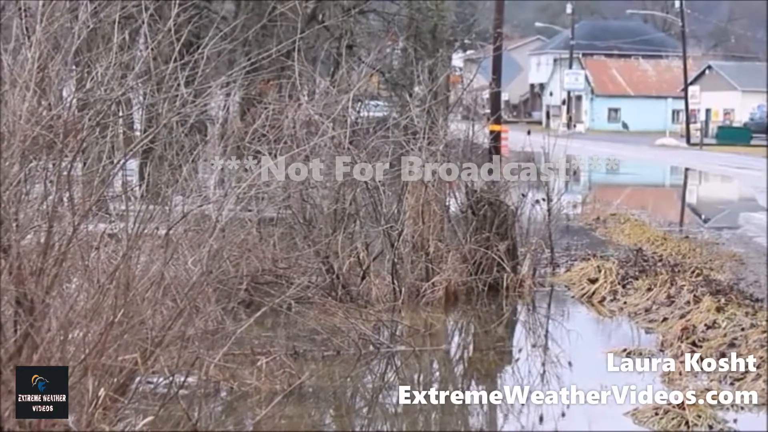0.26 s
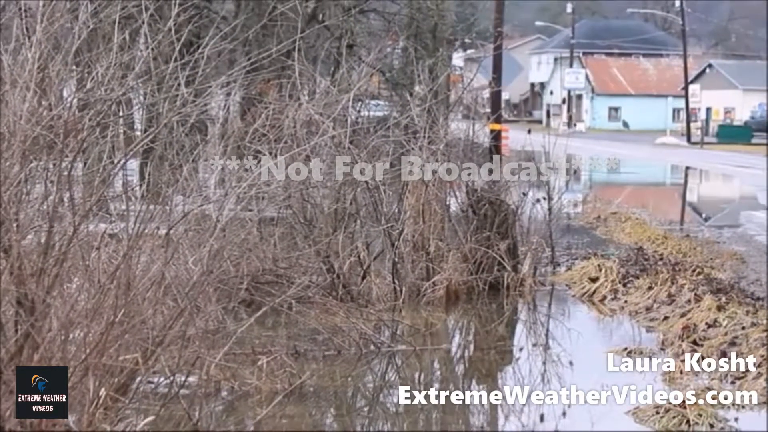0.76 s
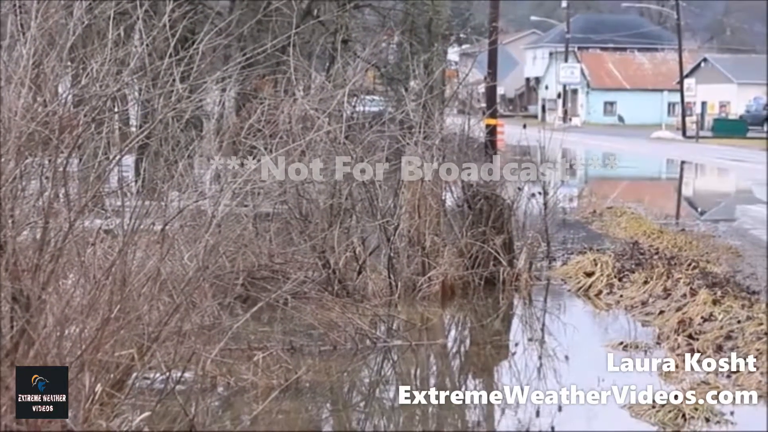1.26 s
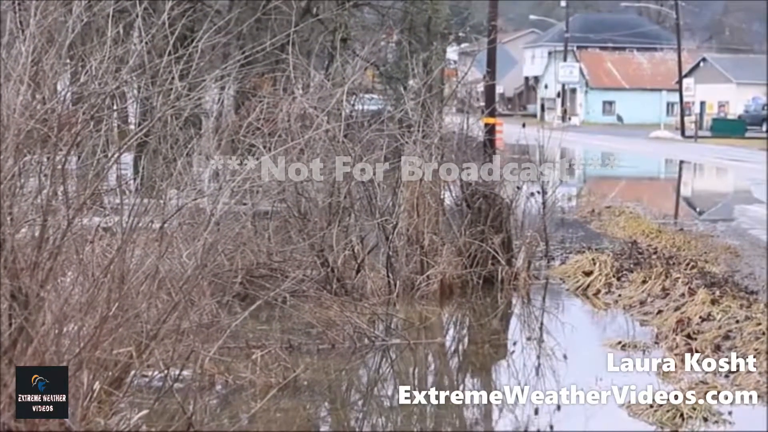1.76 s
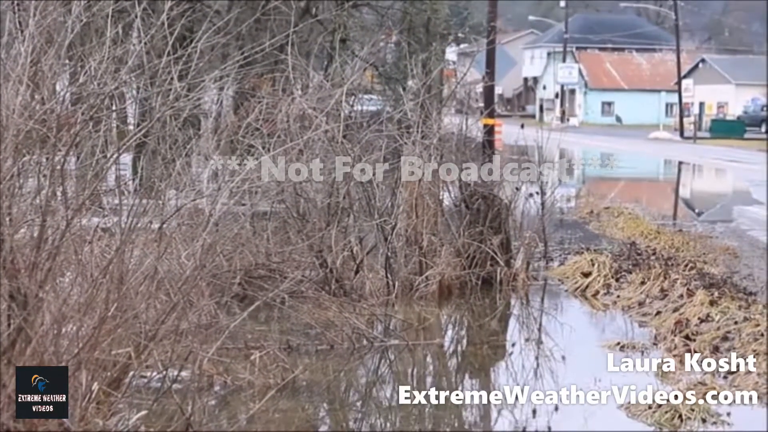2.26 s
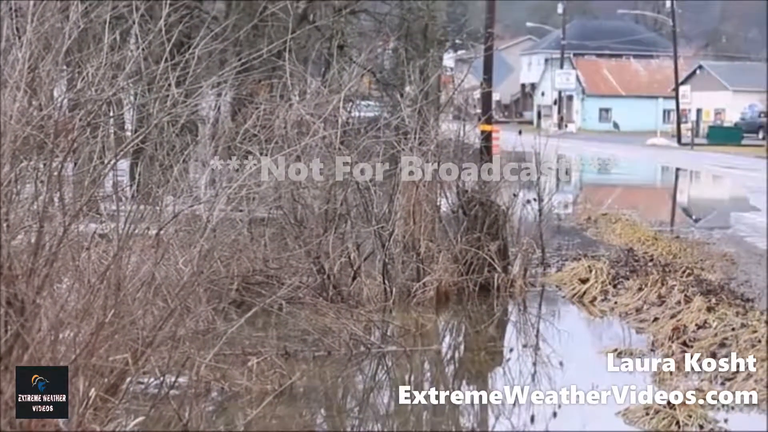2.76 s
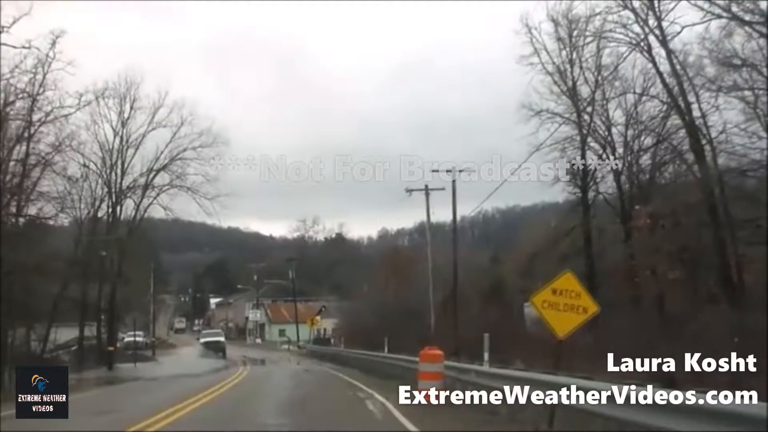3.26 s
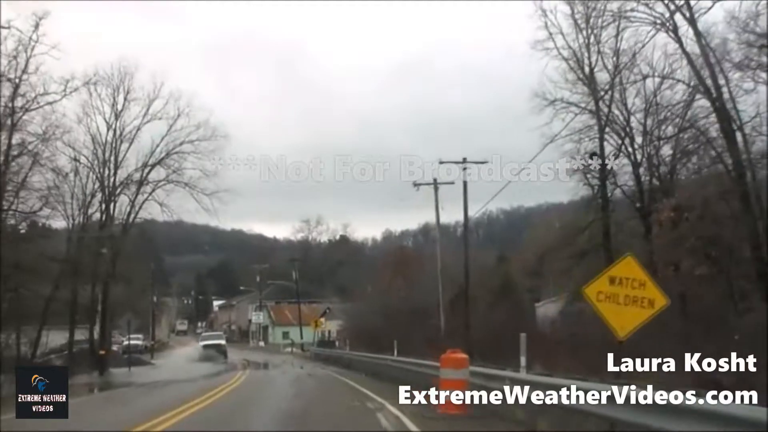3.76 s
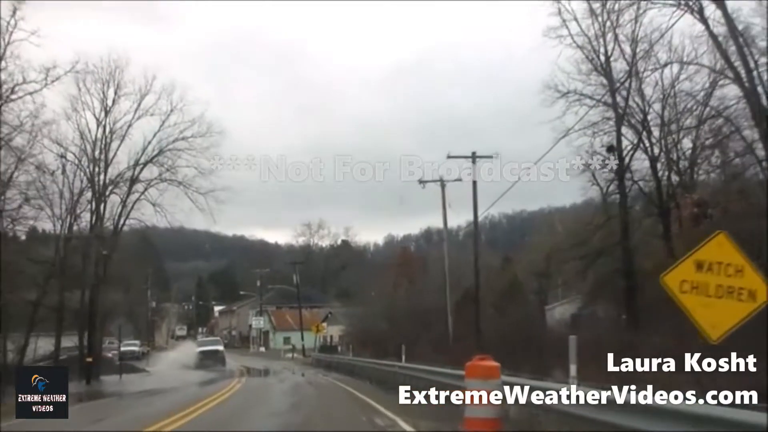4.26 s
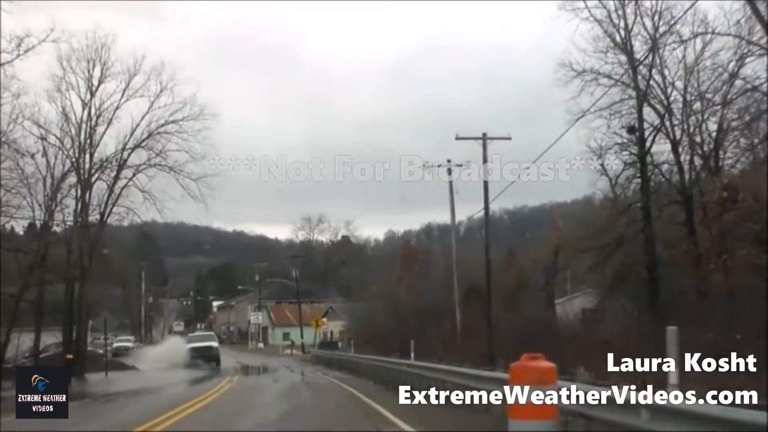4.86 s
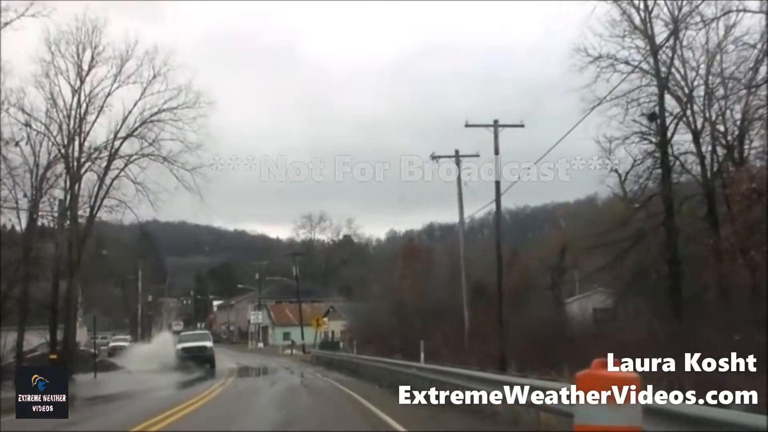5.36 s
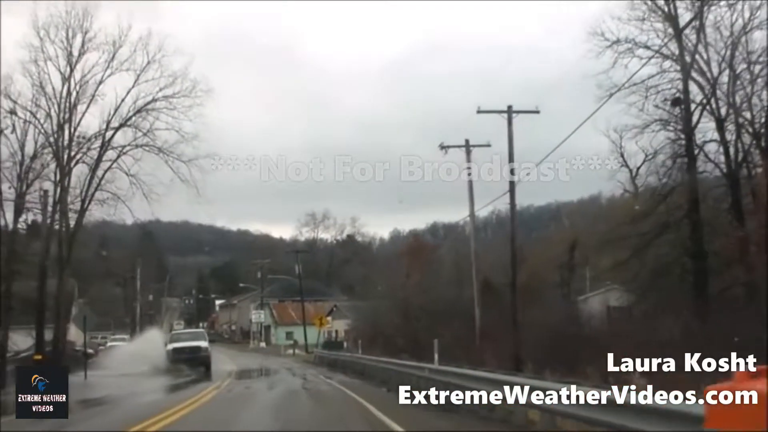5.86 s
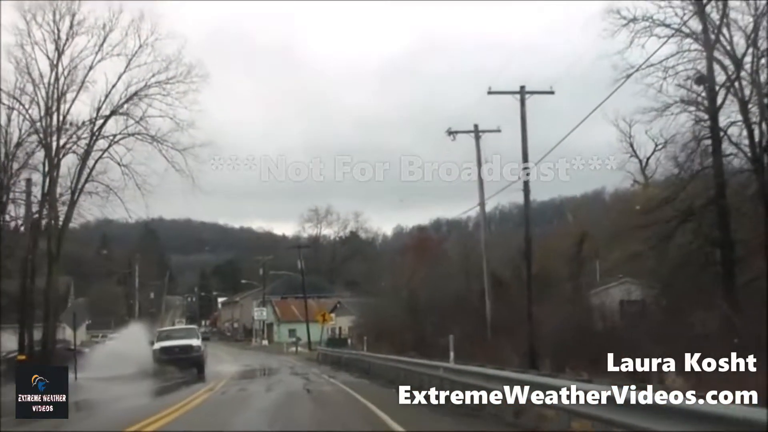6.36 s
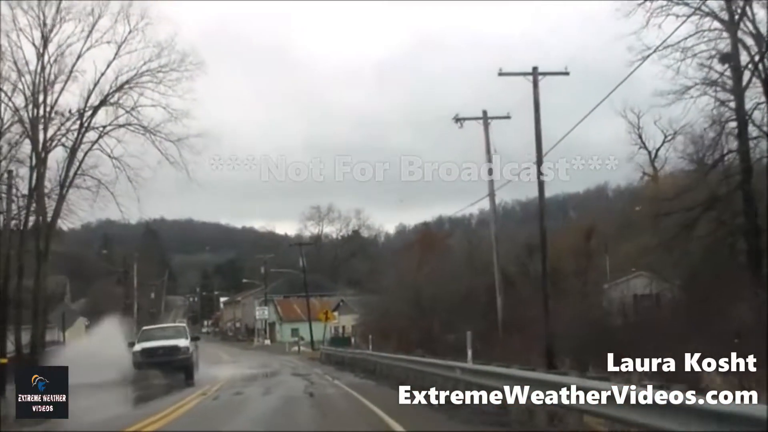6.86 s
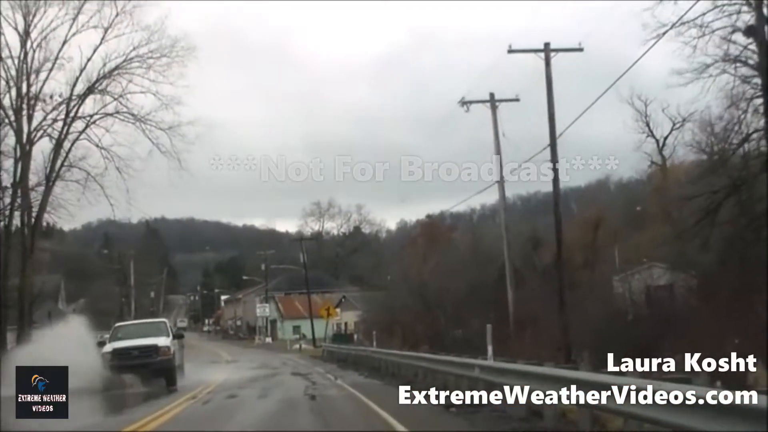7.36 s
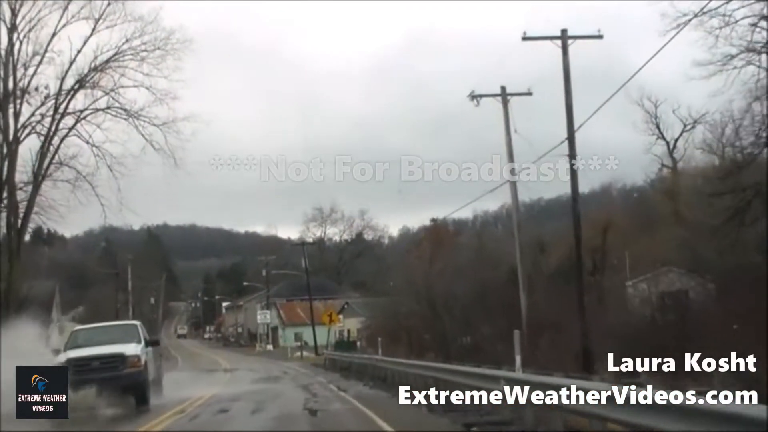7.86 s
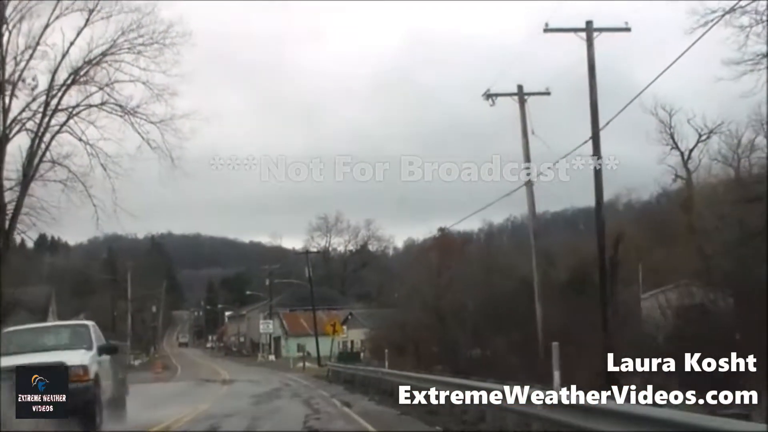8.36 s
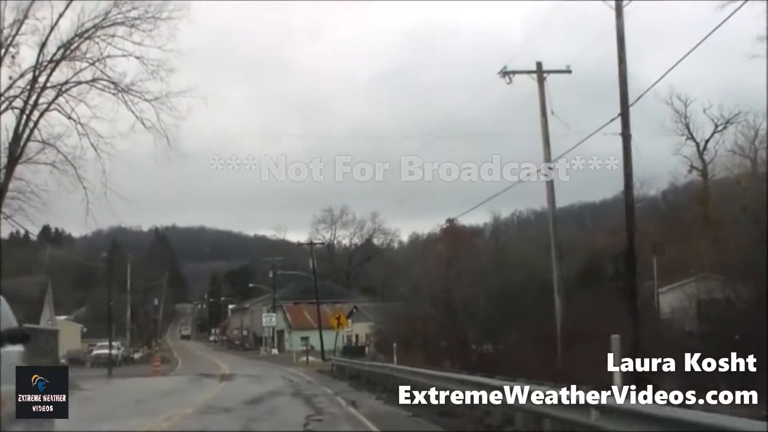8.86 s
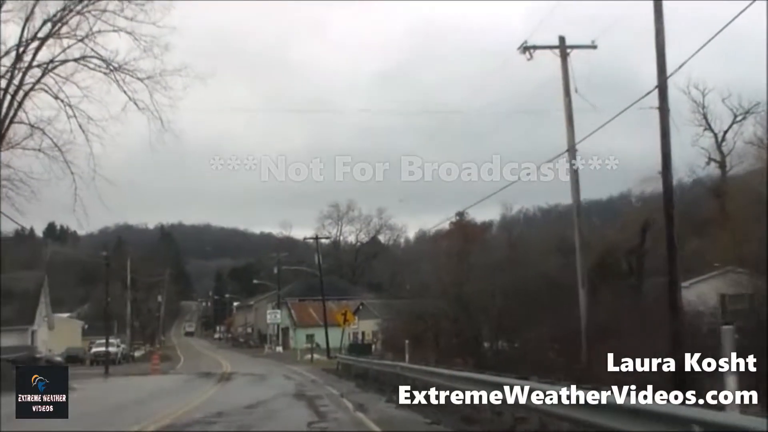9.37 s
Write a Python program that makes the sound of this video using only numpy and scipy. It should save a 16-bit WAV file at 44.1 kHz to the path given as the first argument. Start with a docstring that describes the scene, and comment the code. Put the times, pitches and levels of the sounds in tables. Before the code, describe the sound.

Close to a wet road outdoors, a vehicle drives off, its tyre roar, watery spray and low exhaust hum fading with distance. After three seconds it cuts abruptly to the inside of a moving car: deep boom, drumming floor, dull road roar, splashes underneath, faint rapid ticking and small trim knocks, the level dipping repeatedly with tiny clicks. An oncoming pickup hisses past softly near the end.

```python
"""On a wet roadside a vehicle drives away: exhaust lines, tyre roar and spray noise fade with distance.
Then, abruptly, the inside of a moving car: low noise bands boom and drum, and bursts of drops wash below.
Something small ticks fast and high as struck noise, and damped modes knock in the trim.
The scene dips in level again and again, each dip opened by a click; an oncoming pickup hisses past."""
import sys
import numpy as np
from scipy import signal
from scipy.fft import rfft, irfft, next_fast_len
from scipy.io import wavfile
from scipy.ndimage import uniform_filter1d, map_coordinates

SR = 44100
rng = np.random.default_rng(int(sys.argv[2]) if len(sys.argv) > 2 else 0)


def file_out(sig):
    """Save sig as 16-bit WAV at sys.argv[1]."""
    # one column per channel
    cols = np.atleast_2d(sig).T
    # limit, then scale
    lim = np.clip(cols, -1, 1)
    pcm = np.round(lim * 32767).astype(np.int16)
    wavfile.write(sys.argv[1], SR, pcm)


N = 424240
T = np.arange(N) / SR
CABIN_START_S = 2.977
TOP_HZ, CABIN_TOP_HZ = 15700, 14250

# --- roadside
# puffs of air: (time [s], length [s], level [dB])
PUFFS = [(-0.05, 0.07, -35), (0.38, 0.06, -41), (1.55, 0.06, -49), (1.8, 0.13, -49)]
# spectrum of moving air: (frequency [Hz], relative density [dB])
AIR_SPECTRUM = [(15, -9), (45, 8), (80, 9), (130, -27), (300, -50)]
# dull tyre roar: (frequency [Hz], relative density [dB])
ROAR_SPECTRUM = [(30, -40), (70, -22), (120, -10.5), (200, -2), (250, -2.5), (350, -.5), (480, -1.5),
                 (600, -8), (800, -14), (1500, -50)]
# tread pumping water: (frequency [Hz], relative density [dB])
TREAD_SPECTRUM = [(300, -43), (520, -8), (660, 0.5), (820, 2.5), (1000, -0.5), (1250, -2), (1700, -7.5),
                  (2100, -19.5), (3500, -92)]
# falling spray: (frequency [Hz], relative density [dB])
SPRAY_SPECTRUM = [(1000, -40), (1550, 0.5), (2000, 1), (2600, -1), (3600, -5.5), (5300, -9.5),
                  (7000, -16.5), (8500, -23), (10500, -37), (15700, -55)]
# the finest drops: (frequency [Hz], relative density [dB])
MIST_SPECTRUM = [(4500, -25), (6500, 0.5), (8200, 0), (10000, -6), (12000, -12), (15700, -25)]
# a tyre slaps standing water: (time [s], burst against the steady tread noise [dB], t60 [s])
WATER_SLAP = (2.576, 7, 0.035)
# a tyre thuds through a hollow: (time [s], length [s], lift of the roar [dB])
ROAD_HOLLOW = (0.72, 0.063, 2.1)
# exhaust lines, 8 being the firing rate: (multiple of the cycle rate, relative level [dB])
EXHAUST_LINES = [(5, -21), (6, -17.5), (7, -17.5), (8, 0.5), (9, -10), (10, -11.5), (11, -3.5), (13, -18),
                 (16, -21), (17, -19.5), (19, -19), (23, -16.5), (31, -13)]
# the departing vehicle's path
NEAREST_S, NEAREST_M, SPEED_M_PER_S = 0.094, 8.8, 14.36
# the engine cruises, then sags ever faster once the driver lifts off
CRUISE_HZ, LIFT_OFF_S, SAG_HZ_PER_S2 = 17.85, 2.32, 4.6
# pitch weakened by the ground reflection at the nearest point; it rises in step with distance
GROUND_NOTCH_HZ = 140

# --- cabin
# stereo field: (frequency [Hz], left-right likeness [0-1], left over right [dB])
CABIN_FIELD = [(60, 1, -6.5), (130, 0.93, -3.5), (290, 0.91, -1.5), (640, 0.96, 0), (1400, 0.8, .5),
               (3100, 0.74, 0.5), (6960, 0.091, 1), (12000, 0.086, 0)]
# cabin hiss: (frequency [Hz], relative density [dB])
HISS_SPECTRUM = [(500, 9.5), (4000, 0.5), (7000, 0), (12000, 0.5), (12700, -9), (14200, -16)]
# the level dips briefly and recovers: (time [s], depth [dB])
LEVEL_DIPS = [(3.98, 5), (4.36, 5), (4.83, 9.5), (4.981, 8), (5.38, 4), (5.88, 1.5), (6.08, 3.5),
              (6.42, 3.5), (6.69, 2), (6.98, 5.5), (7.25, 5), (7.46, 3.5), (7.63, 2.5), (8.14, 4),
              (8.75, 5.5), (9.0, 1.5)]
CRACKLE_TOP_HZ = 7000
# trim knocks and ticks: (time [s], relative level [dB], pitch of the main mode [Hz])
TRIM_KNOCKS = [(4.485, -50, 1400), (4.693, -37.5, 950), (5.049, -55, 1300), (6.359, -52, 1100),
               (8.932, -34, 1150), (9.172, -43, 900), (9.473, -37.5, 1130)]
# modes of the trim: (ratio to the main mode, typical relative level [dB], t60 [s])
TRIM_MODES = [(1, 4.5, 0.024), (1.14, -18, 0.017), (1.85, -10, .022), (2.3, -7, 0.021), (2.6, -9, .016)]
TICK_HZ, TICK_START_S = 27.47, 2.9738
# fader of the fast ticking: (time [s], relative level [dB])
TICK_FADER = [(3.0, -58.5), (4.2, -57.5), (4.45, -60), (4.75, -57), (6.2, -57.5), (6.65, -53.5), (7.1, -55),
              (7.6, -59), (9.62, -62.5)]
# two contacts per cycle: (delay [s], relative level [dB], t60 [s])
TICK_CONTACTS = [(0, 3, 0.049), (0.0113, 3, 0.053)]
# ring of the first contact: (frequency [Hz], relative density [dB])
TICK_SPECTRUM = [(7400, -28), (8300, -8), (9300, -8), (9900, 1.5), (10400, -6), (11400, -12), (12100, -5),
                 (12700, -30)]
# ring of the second contact: (frequency [Hz], relative density [dB])
TOCK_SPECTRUM = [(6000, -17.5), (7700, -12.5), (8400, 1), (9200, -6.5), (9900, -4), (10600, -15),
                 (12100, -8), (12700, -32)]
# boom of the body: (frequency [Hz], relative density [dB])
BOOM_SPECTRUM = [(5, -26), (14, -4.5), (26, -1), (41, 2.5), (50, -1), (58, -15), (80, -23), (150, -73.5)]
# drumming floor panels: (frequency [Hz], relative density [dB])
DRUM_SPECTRUM = [(40, -20), (62, -2), (88, -2.5), (108, -1), (118, -6), (135, 2), (152, -1.5), (175, -11.5),
                 (210, -21), (350, -58.5)]
# the body heaves on its springs: (time [s], length [s], lift of the boom [dB])
BODY_HEAVES = [(4.89, 0.14, 4), (5.33, 0.058, 5), (6.82, 0.054, 2.5), (7.52, 0.084, 4)]
# rough patches under the car: (time [s], length [s], lift of the road roar [dB])
ROUGH_PATCHES = [(3.11, 0.32, 5.5), (3.72, 0.29, 3), (4.05, 0.42, 3), (4.68, 0.13, 2.5), (5.27, 0.072, 5),
                 (5.55, 0.28, 2.5), (6.25, 0.19, 2.5), (6.54, 0.079, 5), (6.82, 0.2, 6), (7.08, 0.13, 3),
                 (8.61, 0.12, 3.5), (9.06, 0.37, 3.5), (9.54, 0.1, 7.5)]
ROUGH_ATTACK_S, ROUGH_RELEASE_S = 0.033, 0.054
# tyre roar heard inside: (frequency [Hz], relative density [dB])
ROAD_SPECTRUM = [(130, -32), (195, -1), (240, 1), (300, 0), (380, -3), (470, -9.5), (540, -11.5),
                 (650, -13.5), (760, -18.5), (1200, -49)]
# narrow cabin resonance: (frequency [Hz], relative density [dB])
DRONE_SPECTRUM = [(380, -20), (470, -4.5), (530, -11), (565, -10.5), (595, 1.5), (615, -6.5), (650, -18),
                  (760, -20), (860, -53)]
# how hard the tyres stir that drone: (time [s], relative level [dB])
DRONE_FADER = [(3, -57), (4.5, -56), (7.7, -54), (9.62, -46.5)]
# how wet the road is, heard as wash: (time [s], relative level [dB])
WETNESS = [(3.0, -53.5), (3.6, -52), (4.28, -54), (4.42, -55.5), (5.1, -57.5), (5.6, -56), (6.1, -58.5),
           (6.6, -55), (8.3, -56), (8.9, -53.5), (9.62, -51)]
# water washing under the floor: (frequency [Hz], relative density [dB])
WASH_SPECTRUM = [(330, -25), (470, -4.5), (540, -9), (650, -4), (770, 3), (840, -1.5), (950, 0.5),
                 (1170, -6.5), (1260, -2.5), (1360, -6), (1480, -3.5), (1620, -6.5), (1900, -11.5),
                 (3500, -57)]
# fizz of the wash: (frequency [Hz], relative density [dB])
FIZZ_SPECTRUM = [(1400, -20), (2100, -1), (2550, 3.5), (3000, -1.5), (3600, -5), (4300, -9.5), (7000, -32),
                 (12000, -35)]
# bright spray: (frequency [Hz], relative density [dB])
SPLASH_SPECTRUM = [(1500, -23), (3500, -10), (4600, 1), (5700, 1.5), (6800, 2.5), (8000, -4), (11000, -7.5),
                   (14000, -20)]
# sizzle through shallow water: (frequency [Hz], relative density [dB])
SIZZLE_SPECTRUM = [(1500, -15), (2250, -14), (2450, 1), (2900, -5), (3500, 0), (3900, -12), (7000, -17)]
# puddles spray the wheel arches: (time [s], length [s], relative level [dB])
PUDDLE_HITS = [(2.944, 0.07, -54), (3.102, 0.13, -45), (3.32, 0.13, -45), (3.504, 0.056, -52.5)]
PUDDLE_ATTACK_S, PUDDLE_RELEASE_S, SPRAY_RELEASE_S = 0.086, 0.047, 0.2
# tyres sizzle through a shallow sheet of water: (time [s], length [s], relative level [dB])
SHALLOW_SHEET = (3.57, 0.54, -57)
# steadily thickening pickup mist: (time [s], relative level then [dB], growth [dB/s])
MIST_RISE = (8.96, -73, 18)
# the oncoming pickup: when it passes, how near, how fast the two close
PASS_S, PASS_M, CLOSING_M_PER_S = 8.71, 2.2, 30


def amp(db):
    """Decibels to gain."""
    return 10 ** (np.asarray(db) / 20)


def unit(x):
    """Scaled to rms 1."""
    return x / np.sqrt(np.mean(x ** 2) + 1e-20)


def noise(channels=2):
    """Unrelated white noises, one per channel."""
    return rng.standard_normal((channels, N))


def along(points, hz):
    """Each column after the frequency, read on a log frequency axis."""
    f, *cols = np.transpose(points)
    return [np.interp(np.log(hz + 1), np.log(f + 1), c) for c in cols]


def fader(rows):
    """A (time, level) table drawn as one value per sample."""
    s, level = np.transpose(rows)
    return np.interp(T, s, level)


def wobble(rate):
    """A smooth random curve, rate knots a second."""
    return map_coordinates(rng.standard_normal(int(N * rate / SR) + 4), [T * rate])


def filtered(x, response):
    """x shaped by a gain that is a function of frequency."""
    m = next_fast_len(N + 8192)
    hz = np.fft.rfftfreq(m, 1 / SR)
    return irfft(rfft(x, m) * response(hz), m)[..., :N]


def coloured(x, spectrum):
    """x given a spectrum, at rms 1."""
    return unit(filtered(x, lambda hz: amp(along(spectrum, hz)[0])))


def droplets(rate, share, channels=1):
    """White rush in which a share of the power is single drops, rate a second."""
    falls = rng.random((channels, N)) < rate / SR
    drops = falls * noise(channels)
    return np.sqrt(share) * unit(drops) + np.sqrt(1 - share) * noise(channels)


def patchy(x, depth_db):
    """x with slowly drifting strong and weak patches in its spectrum."""
    z = signal.stft(x, nperseg=1024)[2]
    field = uniform_filter1d(rng.standard_normal(z.shape), size=3, axis=-2)  # across pitch
    field = uniform_filter1d(field, size=12, axis=-1)  # across time
    return unit(signal.istft(z * amp(depth_db * unit(field)), nperseg=1024)[1][..., :N])


def since(s):
    """Seconds since s; endless before it."""
    return np.where(T >= s, T - s, np.inf)


def swell(s, length, attack, release):
    """0 to 1 and back: rises from s, holds until its length is over, then dies away."""
    return np.clip((T - s) / attack, 0, 1) * np.exp(-np.maximum(T - s - length, 0) / release)


def lifts(rows):
    """The dB added by each listed stretch, eased in and out."""
    return sum(db * swell(s, length, ROUGH_ATTACK_S, ROUGH_RELEASE_S) for s, length, db in rows)


def distance():
    """The departing vehicle's distance, as a multiple of its nearest."""
    return np.hypot(1, SPEED_M_PER_S * (T - NEAREST_S) / NEAREST_M)


def receding(power):
    """The dB of a sound that falls as this power of the distance."""
    return -20 * power * np.log10(distance())


def over_ground(x, bounce=0.27, fade_hz=1500):
    """The ground sends a copy half a period of the notch late; rough ground scatters its treble."""
    echo = filtered(x, lambda hz: 1 / (1 + (hz / fade_hz) ** 2))
    delay = 0.5 / (GROUND_NOTCH_HZ * distance())
    return x + bounce * np.interp(T - delay, T, echo)


def in_cabin(pair, spectrum):
    """Two unrelated noises as a cabin field: bass alike and heavier on the right, treble diffuse."""
    def mid_side(hz):
        turn = np.arccos(np.clip(along(CABIN_FIELD, hz)[0], -1, 1)) / 2
        return amp(along(spectrum, hz)[0]) * [np.cos(turn), np.sin(turn)]

    def balance(hz):
        return amp(along(CABIN_FIELD, hz)[1] * [[0.5], [-0.5]])

    mid, side = filtered(pair, mid_side)
    ears = filtered(np.array([mid + side, mid - side]), balance)
    return ears / np.std(ears.mean(axis=0))


def windows(x, echo=0.081, count=12):
    """Glass and dashboard return weak copies within 30 ms, which ripple the spectrum."""
    delays = rng.uniform(0.002, 0.03, count)
    gains = echo * rng.choice([-1, 1], count)
    copies = sum(g * np.pad(x, ((0, 0), (round(d * SR), 0)))[:, :N] for d, g in zip(delays, gains))
    return (x + copies) / np.sqrt(1 + np.sum(gains ** 2))


def levelled(x, share=0.45, window_s=0.123):
    """A gain control that follows the loudness of x and takes out a share of its swings."""
    power = np.abs(uniform_filter1d(np.mean(x ** 2, axis=0), size=int(window_s * SR)))
    return x * (power / power.mean() + 1e-6) ** (-share / 2)


def dips(recovery_s=0.054):
    """A gain that falls at once and creeps back."""
    return amp(-sum(depth * np.exp(-(since(s) / recovery_s) ** 2) for s, depth in LEVEL_DIPS))


def far_traffic(level_db=-39):
    """A steady dull roar from farther down the road, as shaped noise."""
    return amp(level_db) * coloured(noise(1)[0], ROAR_SPECTRUM)


def breeze(level_db=-46, falloff=1.1, attack_s=0.04, release_s=0.03):
    """Soft puffs of air at the roadside, over a stir that settles as the vehicle leaves."""
    puffs = sum(amp(db) * swell(s, length, attack_s, release_s) for s, length, db in PUFFS)
    return (amp(level_db + receding(falloff)) + puffs) * coloured(noise(1)[0], AIR_SPECTRUM)


def tyres(roar_db=-18.0, tread_db=-18.0, spray_db=-22.5, mist_db=-39.0,
          roar_falloff=1.3, tread_falloff=0.8, spray_falloff=1.205, mist_falloff=1.95,
          flutter_db=0.34, tread_patchy_db=1.3, patchy_db=1.8):
    """Tyres roar, tread pumps water, spray falls as countless drops; the finest mist fades fastest."""
    slap_s, slap_db, slap_t60 = WATER_SLAP
    slap = 1 + amp(slap_db - 60 * since(slap_s) / slap_t60)
    pumping = slap * patchy(droplets(900, share=0.18)[0], tread_patchy_db)
    falling = patchy(droplets(2000, share=0.28)[0], patchy_db)
    floating = patchy(droplets(1500, share=0.28)[0], patchy_db)

    roar_level = amp(roar_db + receding(roar_falloff) + lifts([ROAD_HOLLOW]))
    roar = roar_level * coloured(noise(1)[0], ROAR_SPECTRUM)
    tread = amp(tread_db + receding(tread_falloff)) * coloured(pumping, TREAD_SPECTRUM)
    spray = amp(spray_db + receding(spray_falloff)) * coloured(falling, SPRAY_SPECTRUM)
    mist = amp(mist_db + receding(mist_falloff)) * coloured(floating, MIST_SPECTRUM)
    slosh = amp(flutter_db * wobble(21.9))
    return over_ground(roar + slosh * (tread + spray + mist))


def exhaust(level_db=-19.5, falloff=1.2, sag_db_per_hz=2.5, waver_db=1.6, phase_drift=0.18,
            upper_db=1.3, upper_falloff=0.27):
    """Sines on the engine cycle, spread by uneven firing; lift-off drops pitch, softens low lines."""
    sag_hz = SAG_HZ_PER_S2 * np.maximum(T - LIFT_OFF_S, 0) ** 2
    turns = np.cumsum(CRUISE_HZ - sag_hz) / SR
    dulling = upper_db + receding(upper_falloff)  # higher lines sink faster with distance
    easing = -sag_db_per_hz * sag_hz
    hum = np.zeros(N)
    for order, db in EXHAUST_LINES:
        phase = 2 * np.pi * (order * turns + rng.random()) + phase_drift * wobble(8.62)
        change_db = dulling if order > 8 else easing  # above the firing rate or not
        hum += amp(db + change_db + waver_db * wobble(4.82)) * np.sin(phase)
    return np.sqrt(2) * amp(level_db + receding(falloff)) * hum


def cabin_hiss(level_db=-61.5, flicker_db=2.0):
    """A faint noise bed whose level flickers."""
    return amp(level_db + flicker_db * wobble(18)) * coloured(noise(), HISS_SPECTRUM)


def crackle(click_db=-54, click_grows=1.1, drops_db=-76, drop_rate=18, t60=0.0042):
    """A thin noise click opens each dip, louder for the deep ones; single drops tap the car."""
    envelope = sum(amp(click_db + click_grows * depth - 60 * since(s) / t60) for s, depth in LEVEL_DIPS)
    clicks = envelope * noise(1)[0]
    drops = amp(drops_db) * droplets(drop_rate, share=0.85, channels=2)
    return filtered(clicks + drops, lambda hz: 1 / (1 + (hz / CRACKLE_TOP_HZ) ** 4))


def knocks(attack_s=0.00082, scatter_db=2):
    """Plastic trim knocks lightly on bumps: a handful of damped modes per hit."""
    out, t = np.zeros(N + SR), np.arange(SR // 5) / SR
    for s, db, hz in TRIM_KNOCKS:
        ring = np.zeros(len(t))
        for ratio, level, t60 in TRIM_MODES:
            decay = amp(level + rng.normal(0, scatter_db) - 60 * t / t60)
            ring += decay * np.sin(2 * np.pi * hz * ratio * t)
        out[round(s * SR):][:len(t)] += amp(db) * ring * (1 - np.exp(-t / attack_s))
    return out[:N]


def ticking(level_db=1, scatter_db=2, sway_db=1.2, attack_s=0.0021):
    """A small part strikes twice per cycle of a steady vibration; each contact sizzles briefly."""
    ticks = np.zeros((2, N))
    for (delay, db, t60), ring in zip(TICK_CONTACTS, (TICK_SPECTRUM, TOCK_SPECTRUM)):
        cycle, part = np.divmod((T - TICK_START_S - delay) * TICK_HZ, 1)
        age = part / TICK_HZ
        force_db = scatter_db * rng.standard_normal(N)[cycle.astype(int)]  # one draw per strike
        envelope = amp(db + force_db - 60 * age / t60) * (1 - np.exp(-age / attack_s))
        ticks += envelope * coloured(noise(), ring)
    return amp(fader(TICK_FADER) + level_db + sway_db * wobble(8.7)) * unit(ticks)


def pickup():
    """The oncoming pickup's loudness, 1 as it passes and falling with distance."""
    return 1 / np.hypot(1, CLOSING_M_PER_S * (T - PASS_S) / PASS_M)


def puddles(release):
    """The strength of the water thrown up by the puddles, draining over release seconds."""
    return sum(amp(db) * swell(s, length, PUDDLE_ATTACK_S, release) for s, length, db in PUDDLE_HITS)


def water(wash_db=1, fizz_db=-8.0, fizz_grows=0.63, puddle_fizz_db=-9, puddle_spray_db=-9,
          rough_follows=0.17, pickup_wash_db=-53, pickup_fizz_db=-58, pickup_spray_db=-73,
          spatter_db=1.83):
    """Drops hit the underside in uneven spatters, fizzier the wetter the road; plus pickup spray."""
    wet = fader(WETNESS)
    flow = wet + rough_follows * lifts(ROUGH_PATCHES)
    extra_fizz_db = fizz_grows * (wet - wet.mean())
    thrown_up, passing = puddles(PUDDLE_RELEASE_S), pickup()
    mist_s, mist_db, mist_db_per_s = MIST_RISE
    mist = amp(mist_db + mist_db_per_s * (T - mist_s))
    sheet_s, sheet_length, sheet_db = SHALLOW_SHEET

    wash = amp(flow + wash_db) + thrown_up + amp(pickup_wash_db) * passing
    fizz = amp(flow + fizz_db + extra_fizz_db)
    fizz = fizz + amp(puddle_fizz_db) * thrown_up + amp(pickup_fizz_db) * passing
    spray = amp(puddle_spray_db) * puddles(SPRAY_RELEASE_S) + amp(pickup_spray_db) * passing + mist
    sizzle = amp(sheet_db) * swell(sheet_s, sheet_length, PUDDLE_ATTACK_S, PUDDLE_RELEASE_S)

    thrown = wash * in_cabin(droplets(200, share=0.17, channels=2), WASH_SPECTRUM)
    thrown += fizz * in_cabin(droplets(270, share=0.19, channels=2), FIZZ_SPECTRUM)
    thrown += spray * in_cabin(droplets(900, share=0.31, channels=2), SPLASH_SPECTRUM)
    thrown += sizzle * in_cabin(droplets(900, share=0.22, channels=2), SIZZLE_SPECTRUM)
    return windows(amp(spatter_db * wobble(40)) * thrown)


def road_roar(level_db=-44.5, drone_db=0, bump_db=1.3):
    """Tyre roar swells over rough patches; it and the cabin's drone waver with every small bump."""
    roar = amp(level_db + lifts(ROUGH_PATCHES)) * in_cabin(noise(), ROAD_SPECTRUM)
    drone = amp(fader(DRONE_FADER) + drone_db) * in_cabin(noise(), DRONE_SPECTRUM)
    return amp(bump_db * wobble(13)) * (roar + drone)


def car_body(boom_db=-24.5, drum_db=-32.0, drum_follows=0.5, drum_dips=0.92):
    """Road texture shakes body and floor panels; heaves swell the boom, rough patches the drumming."""
    boom = amp(boom_db + lifts(BODY_HEAVES)) * levelled(in_cabin(noise(), BOOM_SPECTRUM))
    drum = amp(drum_db + drum_follows * lifts(ROUGH_PATCHES)) * in_cabin(noise(), DRUM_SPECTRUM)
    return boom + dips() ** drum_dips * drum


def scene(entry_s=0.0045):
    """The roadside in mono, then the cabin in stereo over a faint flickering hiss."""
    roadside = far_traffic() + breeze() + tyres() + exhaust()
    soft_entry = 1 - np.exp(-np.abs(T - CABIN_START_S) / entry_s)
    dipping = cabin_hiss() + ticking() + water() + road_roar()
    cabin = dips() * dipping + crackle() + knocks() + soft_entry * car_body()
    cabin = filtered(cabin, lambda hz: hz < CABIN_TOP_HZ)
    return np.where(T < CABIN_START_S, roadside, cabin)


def record(dry):
    """Nothing is kept above the band limit."""
    return filtered(dry, lambda hz: hz < TOP_HZ)


dry = scene()
out = record(dry)
file_out(out)
```